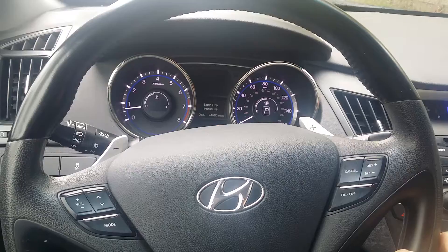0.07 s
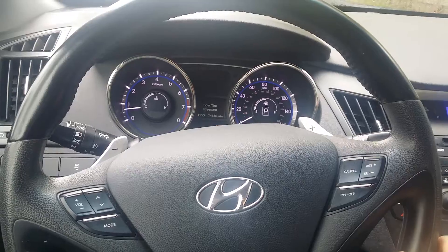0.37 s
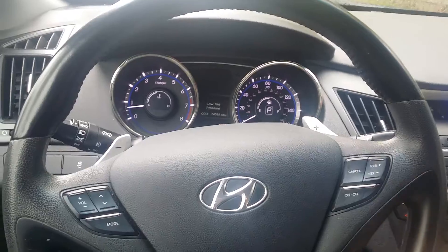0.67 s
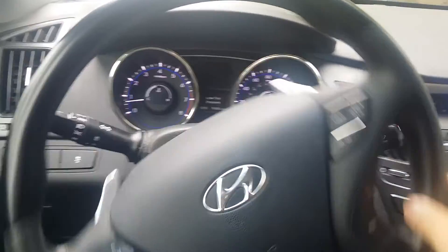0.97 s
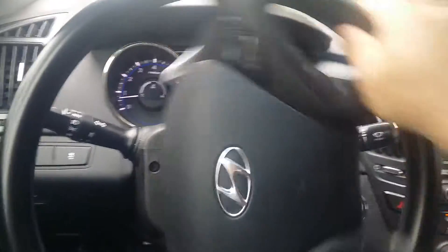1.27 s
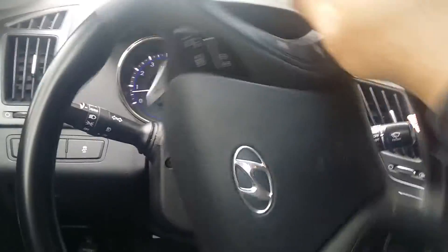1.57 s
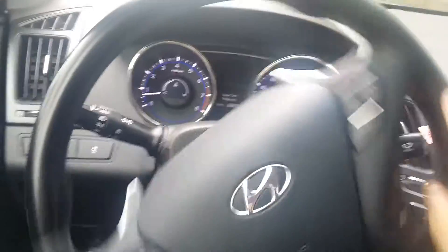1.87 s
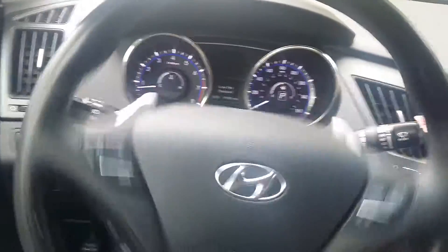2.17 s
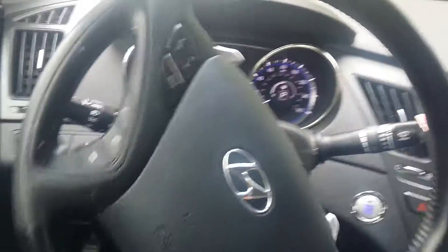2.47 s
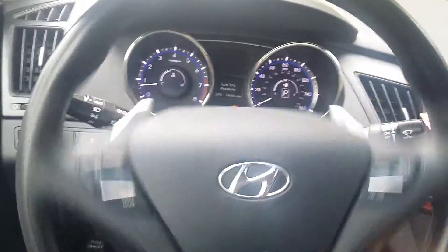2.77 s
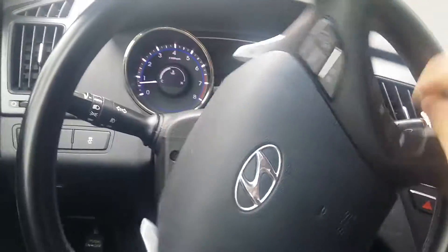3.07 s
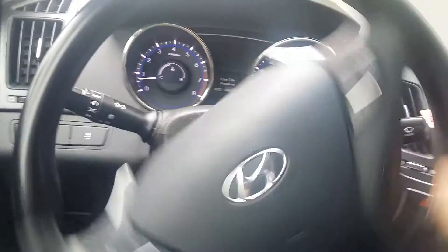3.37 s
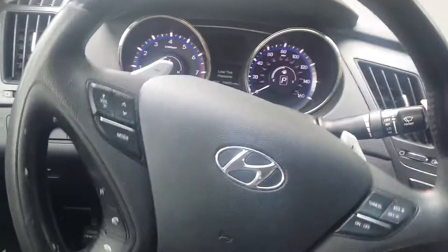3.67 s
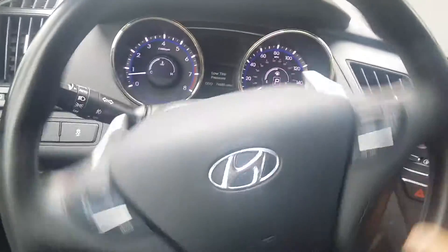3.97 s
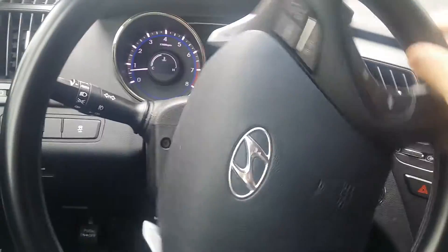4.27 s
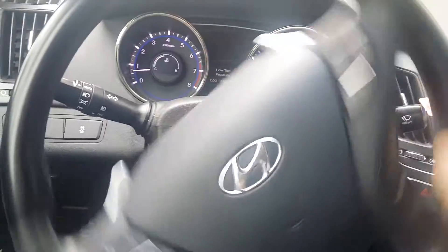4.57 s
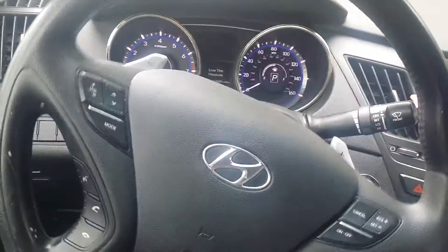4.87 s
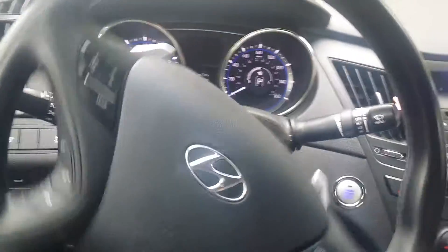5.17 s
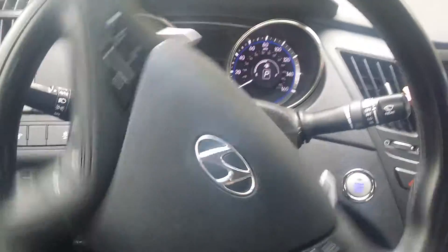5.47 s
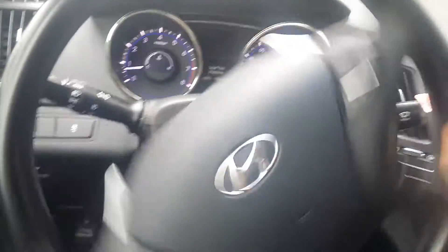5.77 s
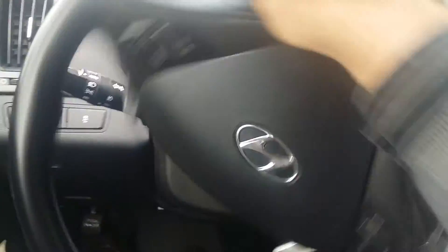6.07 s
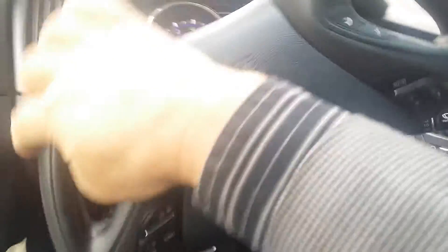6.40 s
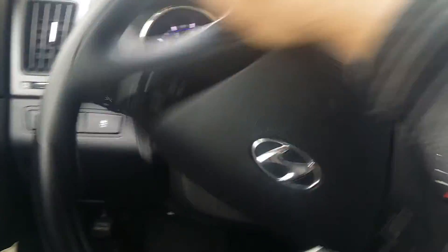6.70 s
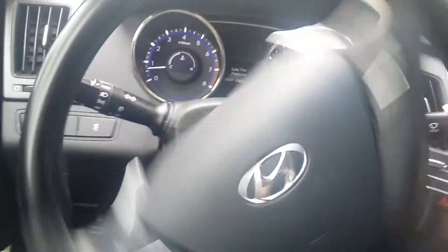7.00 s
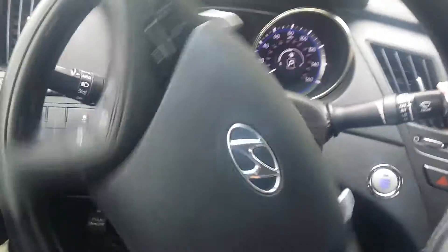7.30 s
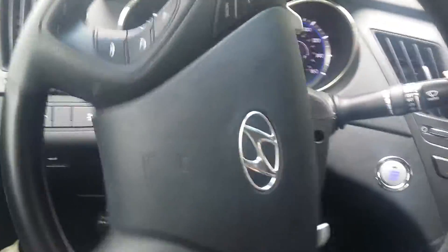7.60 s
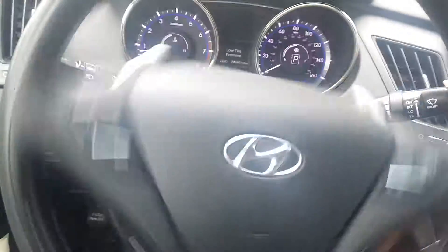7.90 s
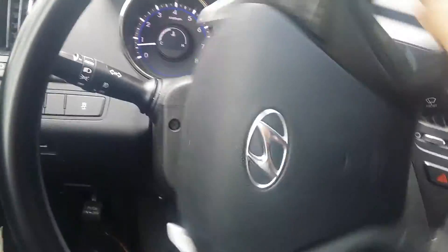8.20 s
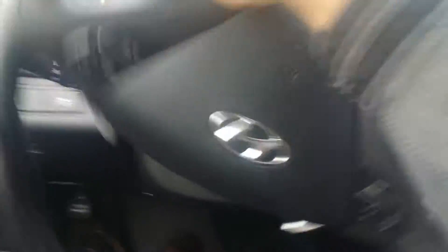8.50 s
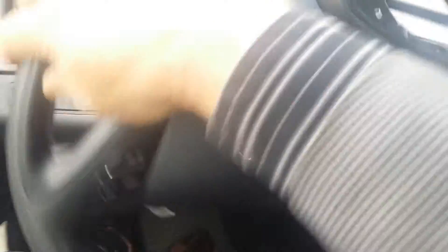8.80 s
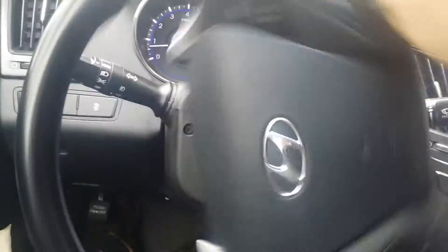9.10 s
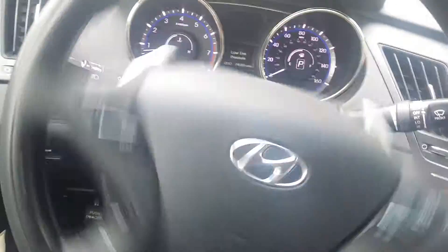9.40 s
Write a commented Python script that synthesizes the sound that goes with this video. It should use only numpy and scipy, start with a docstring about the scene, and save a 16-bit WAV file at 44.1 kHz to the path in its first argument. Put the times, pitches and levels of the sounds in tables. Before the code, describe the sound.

Inside an idling car, the steering column clunks and pops about once a second as a hand rubs the wheel and plastic ticks.

```python
"""The low rumble of an idling engine fades in, heard inside a parked car. Hand and sleeve rub on the
steering wheel as it swings from side to side, plastic trim ticks, and fingers bump the microphone twice.
At each swing the play in the column takes up with a clunk, often with a sharp pop, and the cabin booms.
Midway the steering motor whines faintly. Near the end an arm drags over the spokes and shakes the column
while the trim rattles like a ratchet."""
import sys
import numpy as np
from scipy import signal
from scipy.fft import rfft, irfft, next_fast_len
from scipy.io import wavfile

SR = 44100
rng = np.random.default_rng(int(sys.argv[2]) if len(sys.argv) > 2 else 0)


def put_to_file(sound):
    """Save the sound as 16-bit audio at rate SR, in the file named by the first command-line argument."""
    columns = np.atleast_2d(sound).T  # one column per channel
    safe = np.clip(columns, -1, 1)
    whole_steps = np.round(safe * 32767)
    wavfile.write(sys.argv[1], SR, whole_steps.astype(np.int16))


N = 416744

# The opening fade. Each row: time in seconds, gain in dB.
FADE_IN = [(0, -86), (.4, -65), (.425, -26), (.5, -10.5), (.6, -4.5), (.72, 1.5), (9.45, 2)]
# Hum of the running car. Each row: pitch in Hz, level in dB against the rumble.
HUM_TONES = [(84, -11), (108, -2.5), (339, -22), (570, -26), (705, -33)]
# Strokes of hand and sleeve along the rim.
# Each row: start in seconds, length in seconds, peak in relative dB, brightness in dB.
RIM_STROKES = [(0.98, 0.25, -50, 2), (1.211, 0.39, -38.5, 1), (1.64, 0.43, -45, 2),
               (2.006, .21, -43.5, 2.5), (2.29, 0.3, -47.5, -0.5), (2.59, 0.25, -48, -1.5),
               (2.908, 0.38, -48, 1), (3.35, 0.4, -50, 1), (4.034, 0.25, -52.5, 1), (4.208, 0.25, -51.5, 3),
               (4.546, 0.44, -51.5, -.5), (5.15, .33, -49.5, -1), (5.495, 0.22, -49, -1.5),
               (5.684, 0.86, -42, 1), (6.563, 0.9, -44.5, .5), (7.324, 0.3, -38.5, -2),
               (7.71, 0.23, -40.5, -3), (7.905, 0.4, -46, 1), (8.17, 3.08, -52.5, -6)]
# The column drags harder for a moment. Each row: start in seconds, length in seconds, peak in dB.
COLUMN_DRAGS = [(2.247, 0.27, -48), (5.797, 0.66, -49.5), (5.997, 0.053, -43.5), (6.968, 0.33, -41.5),
                (7.423, 0.22, -49), (7.95, 0.28, -54), (9.1, 0.58, -42.5)]
# Plastic ticks and rattle. Each row: start in seconds, then click, bright edge and hollow body
# in relative dB, then the pitch of the loose part in Hz.
TRIM_TICKS = [(0.858, -41.5, -48.5, -54, 495), (1.0093, -30, -33.5, -53, 500),
              (1.259, -25, -26.5, -39, 747), (2.0646, -37, -35.5, -56, 670), (2.2478, -37, -39.5, -53, 570),
              (2.432, -33, -37, -61, 450), (2.609, -39, -56, -50, 560), (2.8365, -35, -39.5, -43, 457),
              (2.8741, -29.5, -51, -39, 666), (2.9834, -26.5, -41, -34, 760), (3.0037, -29, -41, -35, 710),
              (4.1667, -38, -40, -60, 690), (5.8279, -27, -23, -44, 540), (8.087, -37, -41, -45.5, 1050),
              (8.1146, -39, -39, -50, 520), (8.293, -28, -30.5, -55, 890), (8.322, -10, -18.5, -24.5, 484),
              (8.3703, -18, -21, -18, 480), (8.4234, -14, -18.5, -27, 473),
              (8.4866, -13.5, -21, -30.5, 510), (8.508, -15.5, -24, -29.5, 540),
              (8.539, -19, -31, -27.5, 488), (8.5914, -48, -39, -25.5, 535),
              (8.6109, -14.5, -16.5, -23.5, 533), (8.6688, -14.5, -20, -23, 612),
              (8.724, -21.5, -26.5, -33.5, 1100), (8.748, -30, -34, -32.5, 518),
              (8.7842, -31.5, -37, -33.5, 516), (8.857, -20.5, -22, -44, 493),
              (8.882, -24, -29.5, -43, 500), (8.9329, -34, -48, -42, 870), (9.0061, -26.5, -39, -31.5, 810),
              (9.1538, -35, -45, -40, 443), (9.2187, -37, -47, -29.5, 850),
              (9.2393, -21.5, -28.5, -30.5, 540), (9.2854, -31.5, -41, -44, 470),
              (9.3577, -33, -39, -48, 487), (9.4175, -34, -43, -35, 873)]
# Fingers bumping the left microphone port. Each row: start in seconds, level in relative dB.
FINGER_BUMPS = [(1.404, -0.5), (1.9882, -6.5)]
# Play in the column taking up, once a swing. Each row: start in seconds, slowness of the take-up
# as a factor, then thud, snap, crunch and crack in relative dB.
CLUNKS = [(1.871, 0.89, -26, -15.5, -17, -18.5), (2.826, 0.5, -28, -33.5, -42, -54),
          (3.557, 0.85, -22, -17.5, -15.5, -13), (4.098, 0.11, -33, -22, -33, -44.5),
          (4.749, 1, -28, -15, -18, -15.5), (5.718, 1, -19.5, -46, -36, -40),
          (6.778, 1.0, -16, -15, -15, -15.5), (7.893, 0.45, -21, -37, -30.5, -44),
          (9.077, 0.84, -17.5, -14.5, -18, -12.5)]
# Level rides. Each row: time in seconds, level in dB.
ASSIST_LEVEL = [(3.3, -90), (3.65, -63.5), (4.5, -76), (5.3, -66), (5.6, -93)]   # whine of the steering assist
SLEEVE_LEVEL = [(8.3, -87), (8.38, -44), (8.45, -43), (8.53, -37.5), (8.6, -49.5), (8.7, -38.5), (8.8, -51),
                (8.86, -90)]   # sleeve dragged over the spokes

# Noise colours. Each row: frequency in Hz, spectral density in relative dB.
IDLE_COLOUR = [(15, -63), (25, -15), (43, -23), (65, -7), (113, 4.5), (125, 5.5), (156, -4), (270, -9),
               (310, -25), (338, -21.5), (565, -25), (605, -26), (769, -26), (1160, -33), (1500, -33),
               (1950, -73), (3300, -120)]   # engine rumble
RUB_COLOUR = [(300, -25), (600, 1), (1200, 0.5), (2200, 2), (3600, -1), (5200, -0.5), (7800, 0), (9800, -4),
              (12000, -4), (13700, -1), (15500, -5)]   # skin and cloth on the rim
DRAG_COLOUR = [(180, 4), (270, 7), (380, 4), (520, 2.5), (700, -10.5), (1200, -13.5), (2500, -24.5)]   # friction in the column
CLICK_COLOUR = [(900, -4.5), (1500, 3), (1900, -11.5), (2300, -1), (2600, 0), (3400, 0), (4000, 1),
                (4600, 0), (5100, -3), (5900, 2.5), (6600, -6), (7600, 0), (9000, -8.5), (13000, -51)]   # plastic click
EDGE_COLOUR = [(5000, -13), (8500, -3), (10000, -2), (12300, -1), (14000, 2), (15500, -1)]   # the click's bright edge
HOLLOW_COLOUR = [(250, -27), (400, 14.5), (520, -25), (660, -12), (830, 18.5), (1100, 6), (1700, -4.5),
                 (2400, -4.5), (4000, -30)]   # hollow plastic body
PANEL_COLOUR = [(70, -6), (130, 11), (200, 6.5), (330, -3), (500, -2.5), (900, -35)]   # low knock on the panel
CRACK_COLOUR = [(1180, -5), (2000, 4.5), (2140, -6), (2360, -4), (2690, 3.5), (3370, -18), (4120, -0.5),
                (4730, -6), (6040, 0.5), (10900, 0), (14800, -13), (15500, -34), (16000, -48)]   # sharp pop of the joint
CONTACT_COLOUR = [(120, -17), (230, 7.5), (360, 3.5), (480, -6), (620, -2.5), (850, -13.5), (1300, -14.5),
                  (2000, -26), (3500, -44)]   # dull first contact of a clunk
CRUNCH_COLOUR = [(300, -54), (480, 0), (800, -4), (1100, 6), (1600, 3), (2400, -3), (3500, 0.5),
                 (7000, -33)]   # midrange bite of a clunk
BOOM_COLOUR = [(25, -28), (45, -11), (70, 0), (110, 10.5), (230, -4), (350, -12.5), (600, -27), (1200, -45)]   # cabin boom

# Resonances. Each row: pitch in Hz, level in relative dB, build-up in seconds, 60 dB decay in seconds.
TINKLE_MODES = [(1698, -8.5, 0.00069, 0.041), (1786, -4.5, 0.0014, 0.061), (2040, -11, 0.0027, 0.11),
                (2186, 1, 0.00025, 0.014), (2560, -12.5, 0.0008, 0.021), (4900, -10, 0.0018, .05)]   # small switchgear on the wheel
SHROUD_MODES = [(500.3, -1.5, 0.006, 0.11), (524, -5, 0.0028, 0.097), (808, 1, 0.0019, 0.058),
                (1060, -9, 0.0036, 0.052)]   # hollow plastic shroud
CLANK_MODES = [(716, -11.5, 0.0051, 0.11), (987, -2, 0.0056, 0.071), (1030, -10.5, 0.0041, 0.058),
               (1289, 1, 0.003, 0.062), (1461, 1.5, 0.0013, 0.05), (1735, -5, 0.0015, 0.076),
               (2194, -4.5, 0.0048, 0.038), (2723, -11, 0.0078, 0.051)]   # metal of the column joint
SNAP_MODES = [(466, -5.4, 0.016, 0.087), (496.8, 1.5, 0.01, 0.085)]   # column and dashboard, mids
KNOCK_MODES = [(190.8, -5.5, 0.05, 0.073), (235, 3, 0.014, 0.15), (284, -12, 0.016, 0.26),
               (370.8, -3, 0.022, 0.11)]   # column and dashboard, low mids
THUD_MODES = [(65.3, -15, 0.041, 0.29), (106.9, -1, 0.033, .18), (137.8, -3.5, 0.033, 0.089)]   # column and dashboard, bass

# Stereo width at the two microphone ports. Each row: frequency in Hz, side minus mid in dB.
WIDTH = [(40, -17), (100, -20.5), (250, -10.5), (500, -6.5), (1000, 1), (3000, 0), (15000, 0)]
# Balance between the ports. Each row: frequency in Hz, left minus right in dB.
HIT_PAN = [(100, 0.5), (300, -3.5), (1000, -2), (4500, 0.5), (8000, -8), (14000, -7.5)]   # ticks, clunks and the arm on the spokes
BED_PAN = [(60, -5.5), (150, 0.5), (380, -3), (950, -1), (2380, 1), (5980, 0), (15000, -11)]   # engine, rim and column friction
# Early reflections off the glass. Each row: left delay in seconds, right delay in seconds.
GLASS_DELAYS = [(0.0013, 0.0017), (0.0029, 0.0027), (0.0046, 0.0049)]

TIME = np.arange(N) / SR
HIT_AGE = np.arange(int(0.4 * SR)) / SR   # seconds since a hit began


def from_db(db):
    return 10 ** (np.asarray(db) / 20)


def unit_rms(x):
    return x / np.sqrt(np.mean(x ** 2) + 1e-20)


def in_time(points):
    """A level ride, sample by sample."""
    return np.interp(TIME, *np.transpose(points))


def at_hz(points, hz):
    """A curve read on a log-frequency axis."""
    points_hz, points_db = np.transpose(points)
    return np.interp(np.log(hz + 1), np.log(points_hz), points_db)


def add(out, start, sound):
    """Mix a sound in from `start` seconds."""
    at = round(start * SR)
    out[:, at:at + sound.shape[-1]] += sound[..., :N - at]


def flutter(rate, size=N):
    """A smooth random wobble with spread near 1, changing `rate` times a second."""
    at = np.arange(size) * rate / SR
    return np.interp(at, np.arange(size), rng.standard_normal(size))


def noise(colour, pan, size=N):
    """Coloured stereo noise, narrow in the bass and wide in the treble; rms 1."""
    padded = next_fast_len(size)
    hz = np.fft.rfftfreq(padded, 1 / SR)
    mid, side = rfft(rng.standard_normal((2, padded)))
    sign, width = np.array([[1], [-1]]), from_db(at_hz(WIDTH, hz))
    pair = (mid + sign * width * side) / np.hypot(1, width)
    gain = from_db(at_hz(colour, hz) + sign * at_hz(pan, hz) / 2)
    return unit_rms(irfft(pair * gain, padded)[:, :size])


def arch(start, length, flatness=2.3, end_db=-10):
    """Speed of one movement: a bell that eases in, tops at 1 and eases out."""
    from_middle = np.abs(2 * (TIME - start) / length - 1)
    near = from_middle < 2
    out = np.zeros(N)
    out[near] = from_db(end_db * from_middle[near] ** flatness)
    return out


def swell(rise, t60):
    """Vibration builds up as it spreads through the structure, then dies; top 1."""
    attack = 1 - np.exp(-np.minimum(HIT_AGE / rise, 3) ** 4)
    shape = attack * from_db(-60 * HIT_AGE / t60)
    return shape / (shape.max() + 1e-12)


def burst(colour, rise, t60, tail_db, tail_t60):
    """Crowded modes struck together, with a weaker tail from the cabin."""
    envelope = swell(rise, t60) + from_db(tail_db) * swell(rise, tail_t60)
    return envelope * noise(colour, HIT_PAN, len(HIT_AGE))


def ring(modes, detune, vary_db, lag_s, slow=1):
    """Each blow rings the modes at a strength and pitch of its own, as the wheel angle differs."""
    out = 0
    port_age = HIT_AGE - np.array([[lag_s], [0]])   # the left port hears it later
    for hz, db, rise, t60 in modes:
        pitch, strength = np.clip(rng.standard_normal(2), -1, 1)
        wave = np.sin(2 * np.pi * hz * (1 + detune * pitch) * port_age)
        pan_db = at_hz(HIT_PAN, hz) * np.array([[0.5], [-0.5]])
        out = out + from_db(db + vary_db * strength + pan_db) * swell(rise * slow, t60) * wave
    return out


def grit(depth_db):
    """Micro-slips make the force of a contact uneven; rms 1."""
    return unit_rms(from_db(depth_db * np.clip(flutter(1484, len(HIT_AGE)), -2, 2)))


def engine(idle_db=-45, load_db=12, load_lag_s=0.048, load_width_s=0.082, waver=0.01408, throb_db=4):
    """Idle rumble and a wavering cabin hum, swelling under the steering load around each clunk."""
    load = sum(np.exp(-np.minimum(((TIME - start - load_lag_s) / load_width_s) ** 2, 20))
               for start, *_ in CLUNKS)
    engine_time = np.cumsum(1 + waver * flutter(14)) / SR
    hum = sum(from_db(db + throb_db * flutter(33)) * np.sin(2 * np.pi * hz * engine_time)
              for hz, db in HUM_TONES)
    return from_db(idle_db + load_db * load) * (noise(IDLE_COLOUR, BED_PAN) + hum)


def skin_catches(per_second=10, t60=0.034):
    """Skin catches on the rim: small random jolts of friction, each dying quickly."""
    jolts = (rng.random(N) < per_second / SR) * rng.uniform(0.26, 2.5, N)
    decay = from_db(-60 / (t60 * SR))
    return from_db(-3) * signal.lfilter([1], [1, -decay], jolts + 1e-18)


def rim_rub(grip_db=-58, grip_bright_db=-3):
    """Skin and cloth slide on the rim, skin brighter than cloth; the grip never quite rests."""
    dull_power = from_db(grip_db - grip_bright_db) ** 2
    bright_power = from_db(grip_db + grip_bright_db / 2) ** 2
    for start, length, peak_db, bright_db in RIM_STROKES:
        power = (from_db(peak_db) * arch(start, length)) ** 2
        dull_power = dull_power + power * from_db(-bright_db) ** 2
        bright_power = bright_power + power * from_db(bright_db)
    hiss = noise(RUB_COLOUR, BED_PAN)
    dull = signal.sosfilt(signal.butter(1, 7000, fs=SR, output="sos"), hiss)
    sliding = dull * np.sqrt(dull_power) + (hiss - dull) * np.sqrt(bright_power)
    grain = from_db(-2 + 0.6 * flutter(500) + 1.6 * flutter(31))
    return grain * np.hypot(1, skin_catches()) * sliding


def column_drag(steady_db=-53.5):
    """Low friction of the turning column, which now and then drags harder."""
    harder = sum(from_db(peak_db) * arch(start, length) for start, length, peak_db in COLUMN_DRAGS)
    friction = np.hypot(from_db(steady_db), harder)
    return friction * from_db(2.7 * flutter(40)) * noise(DRAG_COLOUR, BED_PAN)


def trim_ticks():
    """Light plastic parts click, ring the hollow shroud and knock on the panel behind it."""
    out = np.zeros((2, N))
    for start, click_db, edge_db, body_db, part_hz in TRIM_TICKS:
        click = from_db(click_db - 9) * burst(
            CLICK_COLOUR, rise=0.002, t60=0.061, tail_db=-13.5, tail_t60=0.15)
        edge = from_db(edge_db) * burst(EDGE_COLOUR, rise=0.0011, t60=0.061, tail_db=-25.5, tail_t60=0.9)
        # Duller, heavier clicks shake the switchgear more, up to the limit of its small travel.
        tinkle_db = min(click_db - 12.5 + 0.57 * (click_db - edge_db), -27)
        tinkle = from_db(tinkle_db) * ring(TINKLE_MODES, detune=0.024, vary_db=2.5, lag_s=0.0001)
        hollow = from_db(body_db - 6.5) * burst(
            HOLLOW_COLOUR, rise=0.00089, t60=0.1, tail_db=-23, tail_t60=0.12)
        shroud = from_db(body_db - 7) * ring(SHROUD_MODES, detune=0.025, vary_db=-0.5, lag_s=0.00014)
        part_mode = (part_hz, 0, 0.002, 0.075)
        part = from_db(body_db - 0.5) * ring([part_mode], detune=0, vary_db=4, lag_s=0.00024)
        panel = from_db(0.79 * body_db - 15.5) * burst(
            PANEL_COLOUR, rise=0.0055, t60=0.22, tail_db=-22, tail_t60=0.28)
        add(out, start, (click + edge) * grit(depth_db=-2.5) + tinkle + hollow + shroud + part + panel)
    return out


def glass_reflections(hits, strength=0.2, above_hz=1570):
    """Windscreen and side glass return the treble within milliseconds and comb its spectrum."""
    treble = signal.sosfilt(signal.butter(2, above_hz, "high", fs=SR, output="sos"), hits)
    out = hits.copy()
    for delays in GLASS_DELAYS:
        for channel, delay in enumerate(delays):
            out[channel] += strength * np.roll(treble[channel], round(delay * SR))
    return out


def finger_bumps(leak_hz=108, low_cut_hz=56, right_db=-34):
    """A finger hits the left port: the pressure jump leaks away and swings through the bass cut."""
    out = np.zeros((2, N))
    jump = np.exp(-2 * np.pi * leak_hz * HIT_AGE) * (1 - np.exp(-HIT_AGE / 0.00004))
    pulse = signal.sosfilt(signal.butter(4, low_cut_hz, "high", fs=SR, output="sos"), jump)
    for start, db in FINGER_BUMPS:
        add(out, start, from_db(db) * np.array([pulse, from_db(right_db) * pulse]))
    return out


def column_nudge():
    """The column leans softly on its mounts."""
    return burst(PANEL_COLOUR, rise=0.0058, t60=0.12, tail_db=-16, tail_t60=0.45)


def joint_crack(gap_s):
    """The joint lets go, then slips again, harder, `gap_s` later."""
    first = from_db(-5) * burst(CRACK_COLOUR, rise=0.0011, t60=0.12, tail_db=-30, tail_t60=0.087)
    second = burst(CRACK_COLOUR, rise=0.00018, t60=0.028, tail_db=-13, tail_t60=0.047)
    delayed = np.pad(second, ((0, 0), (round(gap_s * SR), 0)))[:, :len(HIT_AGE)]
    return (first + delayed) * grit(depth_db=1.5)


def column_clunks(pops_above_db=-30):
    """The joint snaps first; the heavier column, dashboard and cabin air answer later and lower."""
    out = np.zeros((2, N))
    for start, slow, thud_db, snap_db, crunch_db, crack_db in CLUNKS:
        contact = from_db(-24.5) * burst(
            CONTACT_COLOUR, rise=0.0029 * slow, t60=0.17, tail_db=-24.5, tail_t60=0.17)
        crunch = from_db(crunch_db - 10.5) * burst(
            CRUNCH_COLOUR, rise=0.0096, t60=0.073, tail_db=-20, tail_t60=0.28)
        clank = from_db(crunch_db - 5.5) * ring(CLANK_MODES, detune=0.0036, vary_db=0, lag_s=0.00011)
        snap = from_db(snap_db) * ring(SNAP_MODES, detune=0.027, vary_db=1.5, lag_s=0.00012, slow=slow)
        knock_db = -22.5 + 2 * (1 - slow)   # a quick take-up lands harder
        knock = from_db(knock_db) * ring(KNOCK_MODES, detune=0.034, vary_db=2, lag_s=0.00032, slow=slow)
        thud = from_db(thud_db - 1.5) * ring(THUD_MODES, detune=0.038, vary_db=-0.5, lag_s=0.00038)
        boom = from_db(-30.5) * burst(BOOM_COLOUR, rise=0.035, t60=0.66, tail_db=-25, tail_t60=0.45)
        crack = from_db(crack_db) * joint_crack(gap_s=0.0064 * slow)
        add(out, start, crack + contact + crunch + clank + snap + knock + thud + boom)
        add(out, start - 0.053, from_db(-33) * column_nudge())   # takes load just before the clunk
        if crack_db < pops_above_db:   # a joint that does not pop eases over with a second nudge
            add(out, start - 0.017, from_db(-28) * column_nudge())
    return out


def assist_whine(whine_hz=693, waver=0.01143):
    """The electric steering motor sings faintly under load."""
    motor_time = np.cumsum(1 + waver * flutter(4.5)) / SR
    return from_db(in_time(ASSIST_LEVEL)) * np.sin(2 * np.pi * whine_hz * motor_time)


def sleeve_scrape():
    """Cloth drags over the spokes with a grainy rasp."""
    return from_db(in_time(SLEEVE_LEVEL) + 3.3 * flutter(440)) * noise(CLICK_COLOUR, HIT_PAN)


def arm_rumble(above_sleeve_db=6):
    """The arm lying across the spokes shakes the column and the panel."""
    return from_db(in_time(SLEEVE_LEVEL) + above_sleeve_db) * noise(BOOM_COLOUR, HIT_PAN)


def scene():
    """Clunks and ticks bounce off the glass, over a dry bed of friction and engine."""
    hits = glass_reflections(column_clunks() + trim_ticks())
    friction = rim_rub() + sleeve_scrape() + column_drag()
    return hits + friction + arm_rumble() + finger_bumps() + engine() + assist_whine()


def record(dry):
    """Fade in, cut the deep bass, round the highest peaks and cut the very top."""
    faded = dry * from_db(in_time(FADE_IN))
    low_cut = signal.butter(4, 38, "high", fs=SR, output="sos")
    high_cut = signal.ellip(10, 0.2, 70, 15600, fs=SR, output="sos")
    rounded = np.tanh(signal.sosfilt(low_cut, faded))
    return signal.sosfilt(high_cut, rounded)


dry = scene()
out = record(dry)
put_to_file(out)
```